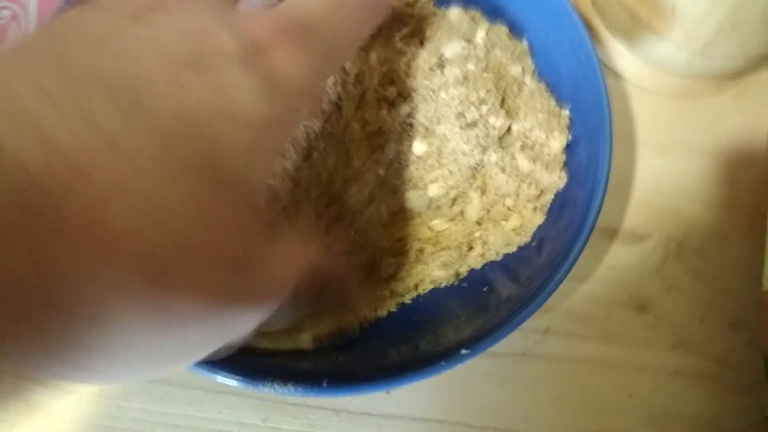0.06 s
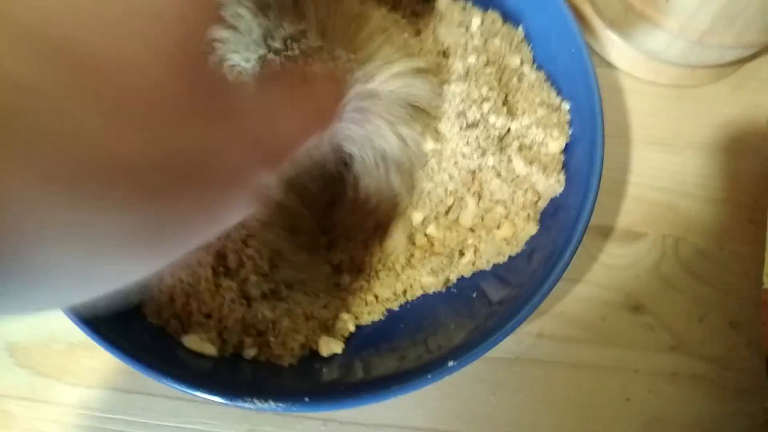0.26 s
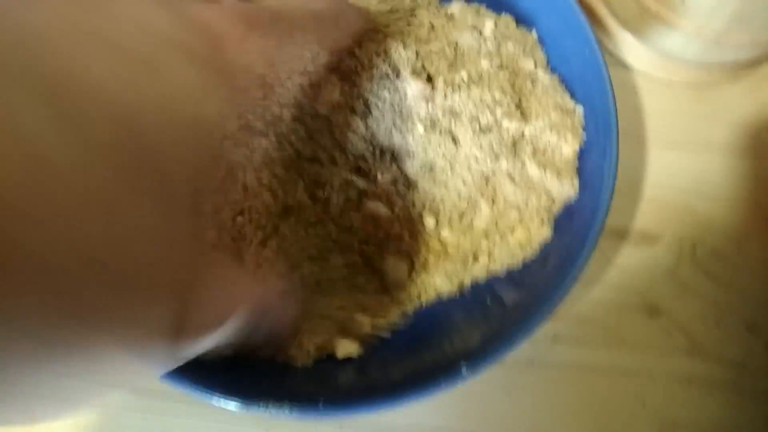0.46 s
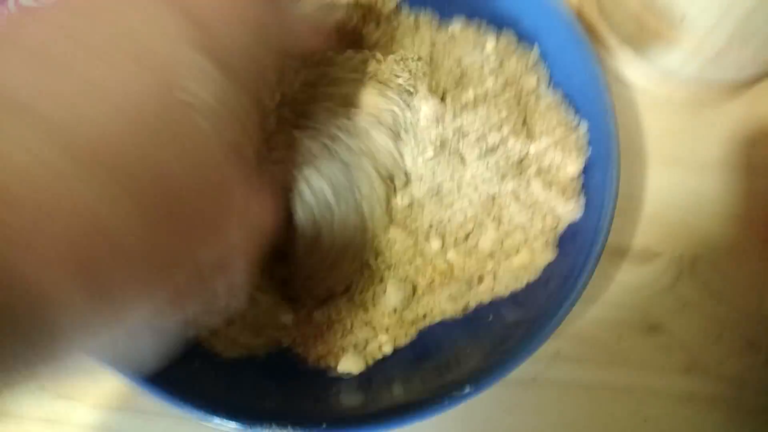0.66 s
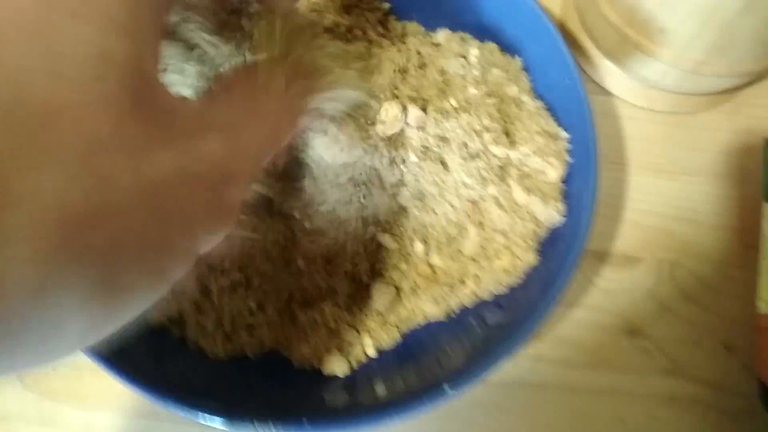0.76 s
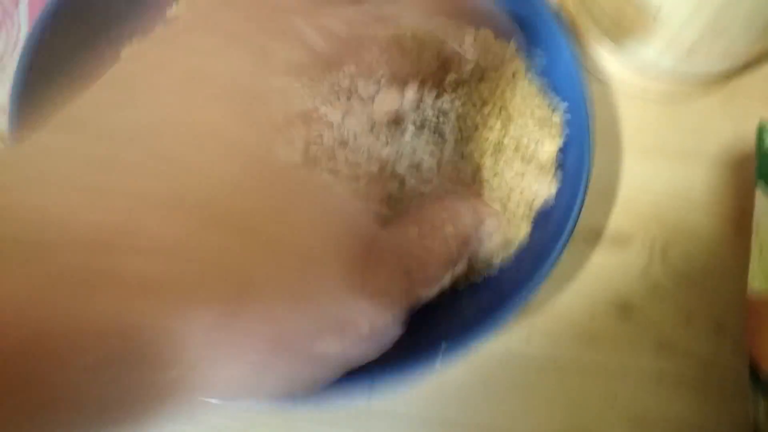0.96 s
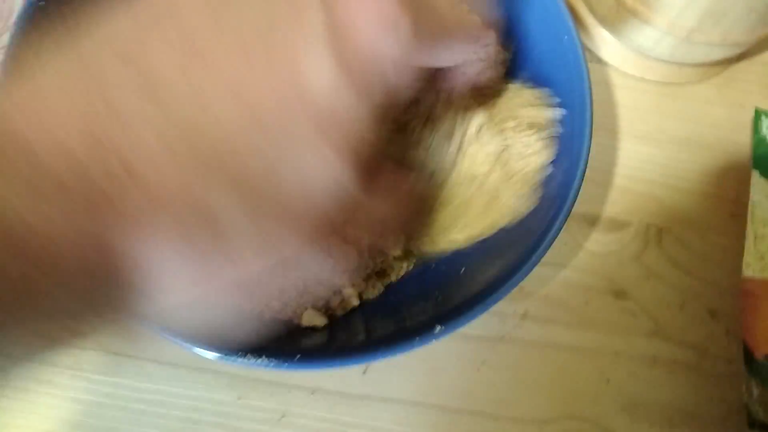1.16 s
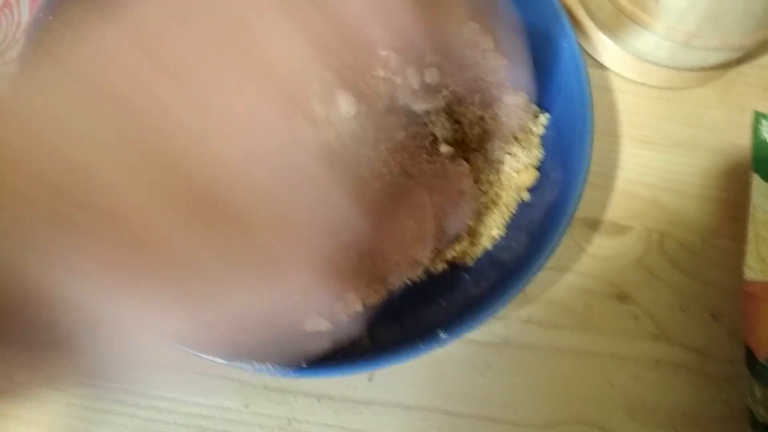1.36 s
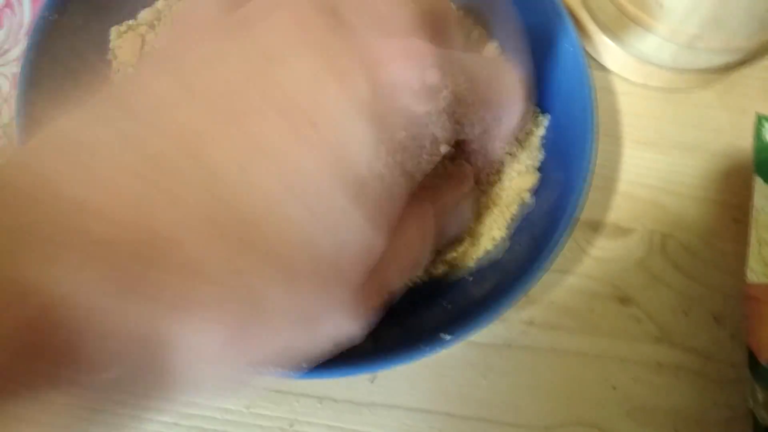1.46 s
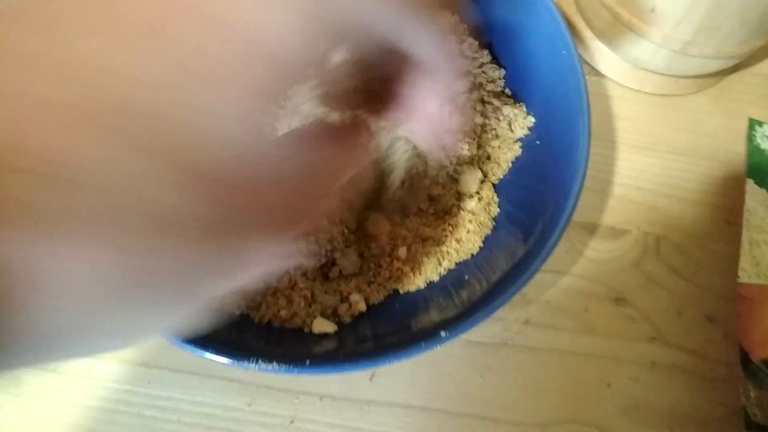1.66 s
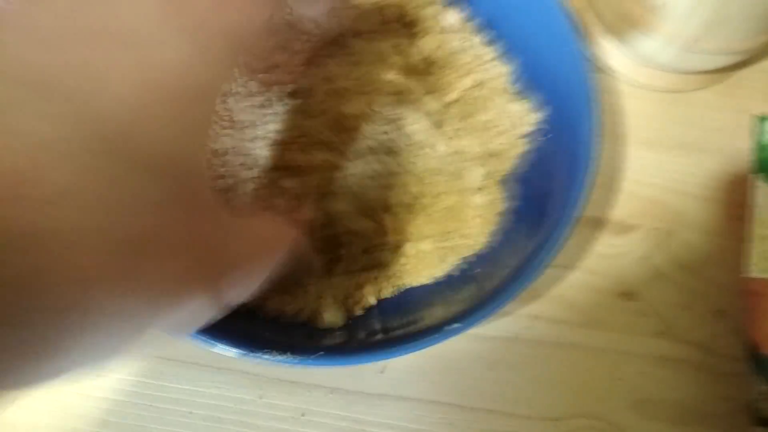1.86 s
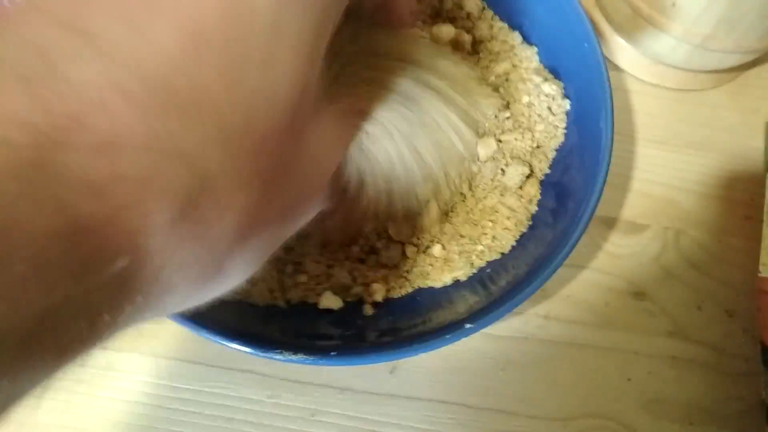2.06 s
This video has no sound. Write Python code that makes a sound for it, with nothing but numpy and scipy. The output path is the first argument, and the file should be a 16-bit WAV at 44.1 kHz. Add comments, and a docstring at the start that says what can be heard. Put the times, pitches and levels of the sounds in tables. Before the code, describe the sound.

A hand stirs dry crumbs in a bowl, with gritty swishes at the start and around 0.5, 1, 1.5 and 1.9 seconds. Crumbs trickle and tick against the faintly ringing bowl between strokes, and it thuds softly on the wooden table near 1.5 seconds. Low microphone handling rumble runs throughout on the left, with soft bumps and rubbing around 0.3, 1.4 and 1.8 seconds.

```python
"""Stirring dry bait in a bowl

A hand stirs crumbly bait round a bowl on a wooden table: five swishes of countless tiny grain slips.
The bowl rings faintly, loose crumbs trickle, hard ones tick on the wall and the table rumbles under
each push. Close to the left microphone, the other hand shifts its grip on the recorder:
soft bumps, creaks and rustle."""
import sys
import numpy as np
from scipy import signal
from scipy.fft import rfft, irfft
from scipy.io import wavfile
from scipy.ndimage import uniform_filter1d

SR = 44100
rng = np.random.default_rng(int(sys.argv[2]) if len(sys.argv) > 2 else 0)


def inscribe(sig):
    """Save sig as 16-bit PCM at rate SR to the path in sys.argv[1].

    A 1-D sig is mono; a 2-D sig holds one channel per row.
    Samples are clipped to [-1, 1] before scaling.
    """
    pcm = np.round(np.clip(np.atleast_2d(sig).T, -1, 1) * 32767)
    wavfile.write(sys.argv[1], SR, pcm.astype(np.int16))


N = 92610

# Strokes of the hand. Each row: moment of full speed, rise and hold in seconds, level in dB,
# fall in dB per second, table rumble in dB relative to TABLE_DB.
HAND_STROKES = [(0.0, 0.1, 0.067, -2.5, 111, -23), (0.075, 0.037, 0.048, 0, 174.5, -13),
                (0.45, 0.033, 0.063, -6, 159, -11.5), (0.535, 0.079, 0.035, 1.5, 140, -18),
                (0.999, 0.095, 0.11, -4, 167, -3.5), (1.448, 0.015, 0.05, 1.5, 172, 1),
                (1.854, 0.038, 0.081, -1, 186, -11)]
# The bowl rocks on the table. Each row: start in seconds, level in dB.
BOWL_THUDS = [(0.451, -34.5), (1.008, -41), (1.019, -38.5), (1.478, -29), (1.497, -40.5)]
# Hard crumbs hit the wall. Each row: start in seconds, then the drive in dB of the low modes,
# middle modes, crack and knock.
CRUMB_TICKS = [(0.428, -67, -57.5, -53, -59), (0.75, -54.5, -57.5, -45, -48), (0.862, -85, -63, -59, -64.5),
               (0.992, -52.5, -51, -49, -75), (1.301, -100, -73, -63, -91), (1.314, -84, -73, -65, -92),
               (1.346, -80, -78, -77, -75), (1.5397, -61, -62, -64, -52.5), (1.76, -77, -92, -56.5, -88),
               (1.782, -85, -65.5, -52.5, -92)]
# Fingers bump the recorder. Each row: time in seconds, push in dB, contact time in ms, creak in dB.
FINGER_BUMPS = [(0.2062, -22, 1.6, -45), (0.2449, -10, 0.4, -33.5), (0.2465, -13.5, 3.2, -45.5),
                (0.2577, -14.5, 1.1, -58), (0.279, -14.5, 0.81, -47), (0.2859, -21, 1.1, -48),
                (0.333, -12.5, 1.38, -54.5), (1.2255, -32.5, 1.56, -57), (1.3577, -16.5, 1.1, -55),
                (1.729, -28.5, 3.5, -41.5), (1.7662, -27, 0.59, -60), (1.7696, -34.5, 0.83, -73),
                (1.8258, -14.5, 0.96, -41.5)]
# Firmness of the holding hand. Each row: time in seconds, rumble in dB.
GRIP_FIRMNESS = [(0, -48.5), (0.13, -47.5), (0.34, -43.5), (0.42, -51.5), (0.63, -46), (0.69, -53),
                 (0.84, -49.5), (0.94, -56), (1.06, -48), (1.3, -53), (1.45, -49), (1.65, -50.5),
                 (1.75, -45), (1.92, -48.5), (2.1, -54.5)]
# Crumbs spill and the grip slides. Each row: middle and half length in seconds, level in dB.
CRUMB_SPILLS = [(0.236, .05, -71.5), (0.384, .03, -67), (0.7, .03, -80), (0.785, 0.036, -64.5),
                (0.862, 0.031, -64.5), (1.24, .04, -84), (1.337, .025, -74), (1.72, .03, -77.5),
                (1.816, .025, -71.5), (2.063, .04, -72)]
GRIP_SLIDES = [(0.312, 0.099, -62), (1.37, 0.042, -69.5), (1.774, 0.037, -68)]
# The bowl's mode frequencies in Hz.
MODE_HZ = [935, 2186, 3790, 5675, 7806, 9200, 9710, 10215, 11460, 11675, 11820, 12490, 12868, 13762]
# How those modes ring freely. Each row: seconds to fall 60 dB, left and right gain in dB.
MODE_RING = [(0.2, -1, -7.5), (0.17, -5, -11), (0.27, -5, -17), (0.26, -13.5, -13), (0.27, -15, -16),
             (0.2, -17, -12.5), (0.16, -13.5, 1), (0.27, -8.5, -2), (0.17, -20, -2), (0.19, -20, 2.5),
             (0.14, -25, -1.5), (0.22, -24, -8), (0.14, -19, -1.5), (0.19, -18.5, -2.5)]
# Each sound's tone at the microphones. Each row: frequency in Hz, relative left and right level in dB.
RUSTLE_TONE = [(212, -9, -33), (584, -14, -27), (722, -23, -60), (1014, 6, -1.5), (1574, -6, -13.5),
               (3200, -1.5, -23), (4580, -12, -13.5), (6050, -9, -22), (6600, -18, -12.5),
               (9150, -10, -9.5), (9700, -18, 0.5), (10860, -21, -2), (11570, -14, 9), (13800, 1, -6.5),
               (15100, -21, -12), (15800, -9, 0.5)]  # stirred grains
TABLE_TONE = [(23.6, -2, -43), (69, 3, 9), (133, 7, 3.5), (177, -1.5, -9.5), (233.3, -5.5, 0),
              (300, -16.5, -19), (450, -25, -38.5), (544, -18, -23), (706, -42, -45), (1050, -44, -36),
              (2980, -41, -36)]  # wood under the bowl
CRUMB_TONE = [(500, -29, -42), (1410, -9, -21), (3200, -0.5, -29), (4500, -18, -23.5), (6900, -19, -27),
              (9600, -13, -17), (12050, -11, 12.5), (12600, -14, -2.5), (14700, -12, -20)]  # crumbs trickling or cracking
KNOCK_TONE = [(410, -41, -31), (695, -38, -20), (1050, 5.5, 6), (2570, 12, -20), (4150, -2, -5),
              (6900, -7.5, -13), (15000, -31, -49)]  # a crumb on the wall
CREAK_TONE = [(193, -17.5, -50), (750, -12.5, -41), (1177, 9.5, -64.5), (2020, -6.5, -29.5),
              (2960, -25.5, -57), (5800, -31.5, -35.5), (12000, -38, -34.5)]  # skin creaking on the casing
RUB_TONE = [(300, 4, -39), (1020, -9, -47), (1710, -11, -52), (2600, -11.5, -76), (4170, -47.5, -67),
            (8250, -28, -55), (13700, -27, -66)]  # skin sliding over it
GRIP_TONE = [(20.4, 1, -36), (70, 6, -31.5), (119, -1.5, -14.5), (159.5, -10, -24), (278, -19, -40),
             (417, -39, -42), (920, -68.5, -51), (1820, -52, -83), (6800, -50, -58), (15000, -81, -56)]  # rumble of the holding hand

GRAINS_PER_S, GRAIN_SPREAD_DB, CLUMP_DB, CLUMPS_PER_S = 9000, 1.5, 0.76, 70
RISE_DB = 20.5  # a stroke's climb over its rise time
RUSTLE_DB, BOWL_DB, TABLE_DB, TRICKLE_RING_DB, CRACK_RING_DB = -47, -58.5, -45, -77, -33
TRICKLE_PER_S, TRICKLE_SPREAD_DB = 850, 2.5
TICK_DECAY_S, THUD_DECAY_S, CREAK_DECAY_S = 0.0035, 0.0042, 0.0013
HAND_DAMPING = 3.25  # the pressing hand shortens the bowl's ring this many times
LOW_HZ, MIDDLE_HZ, HIGH_HZ = (0, 3000), (3000, 9000), (9000, 16000)
CASE_HZ, CASE_Q, BUMP_RIGHT_DB, GRIP_WANDER_DB = 57.4, 1.9, -92, 1.2
TOP_HZ = 15800


def stirring(t):
    """Each stroke rises, holds and fades, driving grain slips, the bowl's damped ring and table rumble."""
    speed, push = 0, 0
    for peak, rise, hold, db, fall, table_db in HAND_STROKES:
        before, after = np.maximum(peak - t, 0), np.maximum(t - peak - hold, 0)
        stroke = undb(-RISE_DB * before / rise - fall * after)
        speed = np.maximum(speed, stroke * undb(db))
        push = np.maximum(push, stroke * undb(table_db + TABLE_DB) * (t > peak))
    thuds = sum(undb(db) * burst(t, at, THUD_DECAY_S) for at, db in BOWL_THUDS)
    clumps = undb(CLUMP_DB * wander(CLUMPS_PER_S))
    slips = grains(GRAINS_PER_S, GRAIN_SPREAD_DB) * speed * clumps
    rustle = undb(RUSTLE_DB) * colour(slips, RUSTLE_TONE)
    bowl = bowl_ring(slips.mean(axis=0), LOW_HZ, HAND_DAMPING)
    bowl += bowl_ring(slips, MIDDLE_HZ, HAND_DAMPING) / 2
    bowl += bowl_ring(slips, HIGH_HZ, HAND_DAMPING)
    rumble = colour(rng.standard_normal(N) * (push + thuds), TABLE_TONE)
    return rustle + level(bowl, BOWL_DB) + rumble


def bowl_ring(force, band, damping=1):
    """The bowl's modes within a band answer a force with fading sines."""
    t = np.arange(SR // 2) / SR
    response = 0
    for hz, (t60, left, right) in zip(MODE_HZ, MODE_RING):
        if band[0] <= hz < band[1]:
            fade = np.exp(-np.log(1000) * damping * t / t60)
            response += undb([[left], [right]]) * np.sin(2 * np.pi * hz * t) * fade
    return signal.fftconvolve(np.atleast_2d(force), response, axes=1)[:, :N]


def crumb_trickle(t):
    """Between strokes loose crumbs slide off the fingers and patter on the heap and the wall."""
    slips = grains(TRICKLE_PER_S, TRICKLE_SPREAD_DB) * swells(t, CRUMB_SPILLS)
    bowl = bowl_ring(slips, MIDDLE_HZ) + bowl_ring(slips, HIGH_HZ)
    return colour(slips, CRUMB_TONE) + level(bowl, TRICKLE_RING_DB)


def crumb_ticks(t):
    """A hard crumb knocks the bowl into ringing and crushes with a crack that wakes the high modes."""
    crack, knock, middle_kicks, low_kicks = np.zeros((4, N))
    for start, low_db, middle_db, crack_db, knock_db in CRUMB_TICKS:
        fade = burst(t, start, TICK_DECAY_S)
        crack += undb(crack_db) * fade
        knock += undb(knock_db) * fade
        low_kicks[int(start * SR)] = undb(low_db)
        middle_kicks[int(start * SR)] = undb(middle_db)
    grit = rng.standard_normal((2, N))
    contact = colour(grit * crack, CRUMB_TONE) + colour(grit * knock, KNOCK_TONE)
    bowl = bowl_ring(low_kicks, LOW_HZ) + bowl_ring(middle_kicks, MIDDLE_HZ)
    return contact + bowl + undb(CRACK_RING_DB) * bowl_ring(grit * crack, HIGH_HZ)


def finger_bumps(t):
    """By the left microphone a soft push rocks the casing for a cycle or two, and the skin creaks."""
    push, creak = 0, 0
    for at, push_db, contact_ms, creak_db in FINGER_BUMPS:
        distance = np.hypot((t - at) * 1000 / contact_ms, 1 / 2)  # rounds the pulse's tip
        push += undb(push_db) * np.exp(1 / 2 - distance)
        creak += undb(creak_db) * burst(t, at - .001, CREAK_DECAY_S)
    omega = 2 * np.pi * CASE_HZ
    casing = signal.bilinear([1, 0, 0], [1, omega / CASE_Q, omega * omega], SR)  # resonant high-pass
    thump = signal.lfilter(*casing, push) * undb([[0], [BUMP_RIGHT_DB]])
    return thump + colour(creak * rng.standard_normal(N), CREAK_TONE)


def grip_noise(t):
    """The hand round the recorder rumbles all the time and rustles when it slides."""
    firmness_db = np.interp(t, *np.transpose(GRIP_FIRMNESS)) + GRIP_WANDER_DB * wander(per_s=22)
    rumble = colour(rng.standard_normal((2, N)) * undb(firmness_db), GRIP_TONE)
    rub = swells(t, GRIP_SLIDES) * grains(per_s=1200, spread_db=3.0)
    return rumble + colour(rub, RUB_TONE)


def grains(per_s, spread_db):
    """Random tiny slips, many weak and a few strong, separate for each microphone."""
    size = undb(spread_db * np.minimum(rng.exponential(size=(2, N)), 6))
    sign = np.sign(rng.standard_normal((2, N)))
    slipping = rng.random((2, N)) < per_s / SR
    return level(size * sign * slipping, 0)


def colour(x, tone):
    """Causal stereo filter from a tone table, with unit power gain averaged over both sides."""
    rows, size = np.array(tone, float), 4096
    log_hz = np.log(np.maximum(np.fft.rfftfreq(size, 1 / SR), 1))
    gain = undb([np.interp(log_hz, np.log(rows[:, 0]), side) for side in rows.T[1:]])
    cepstrum = irfft(np.log(gain))
    cepstrum[:, 1:size // 2] *= 2  # fold to minimum phase
    cepstrum[:, size // 2 + 1:] = 0
    response = irfft(np.exp(rfft(cepstrum)))
    response /= np.sqrt(np.sum(response ** 2) / 2)
    return signal.fftconvolve(np.atleast_2d(x), response, axes=1)[:, :N]


def burst(t, start, decay):
    """Sudden onset, exponential fade."""
    return (t >= start) * np.exp(-np.maximum(t - start, 0) / decay)


def swells(t, table):
    """One bell-shaped rise and fall for each row."""
    return sum(undb(db) * np.exp(-((t - at) / half) ** 2 / 2) for at, half, db in table)


def wander(per_s):
    """Smooth random drift with a spread of 1."""
    step = max(int(SR / per_s), 2)
    stairs = np.repeat(rng.standard_normal(N)[:N // step + 1], step)
    drift = uniform_filter1d(stairs, step)[:N]
    return drift / drift.std()


def undb(db):
    """Decibels to gain."""
    return 10 ** (np.asarray(db) / 20)


def level(x, db):
    """Scale to an rms level."""
    return x * undb(db) / np.sqrt(np.mean(x ** 2))


def scene():
    """The bowl on the table, with handling noise right at the microphones."""
    t = np.arange(N) / SR
    return stirring(t) + crumb_trickle(t) + crumb_ticks(t) + finger_bumps(t) + grip_noise(t)


def record(dry):
    """The handheld recorder cuts the top treble steeply."""
    return signal.sosfilt(signal.ellip(10, .2, 80, TOP_HZ, fs=SR, output="sos"), dry)


dry = scene()
out = record(dry)
inscribe(out)
```